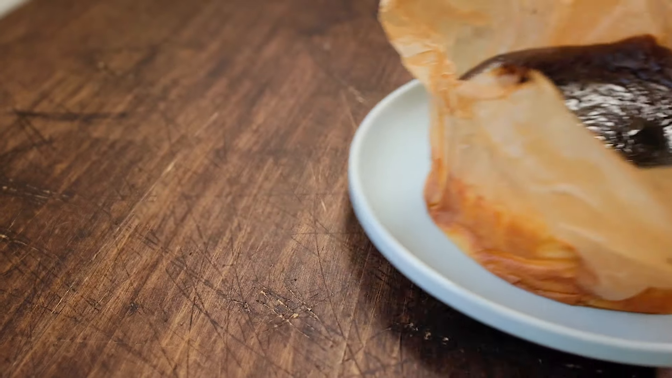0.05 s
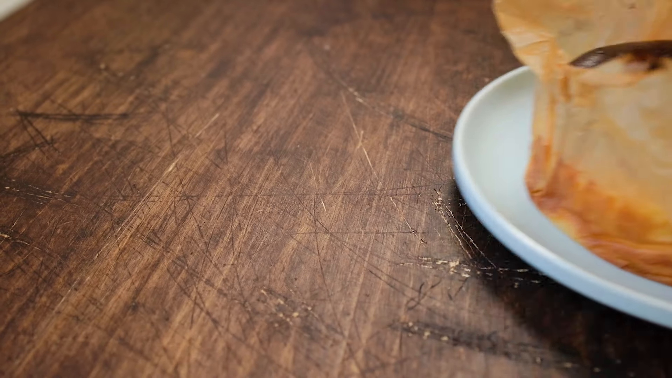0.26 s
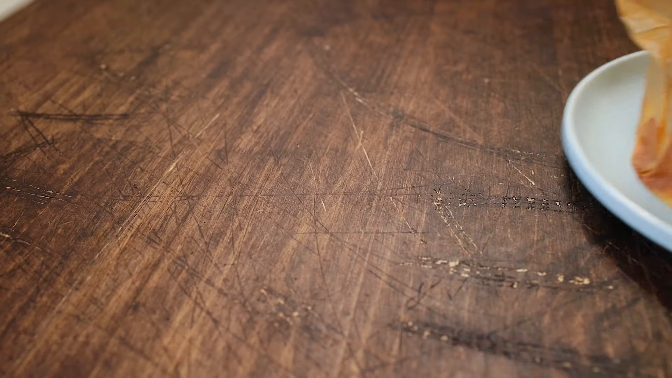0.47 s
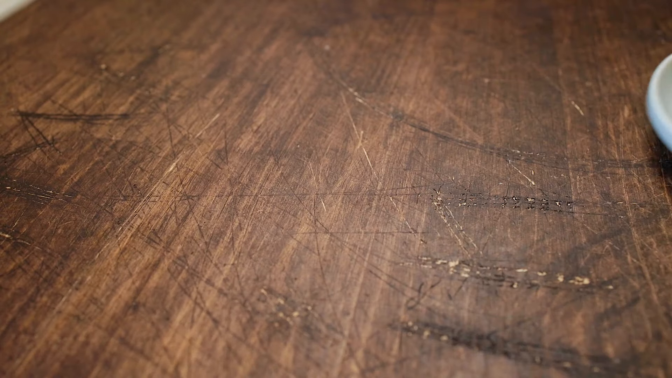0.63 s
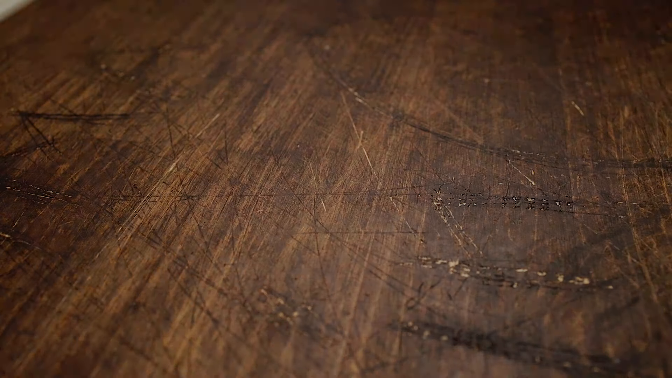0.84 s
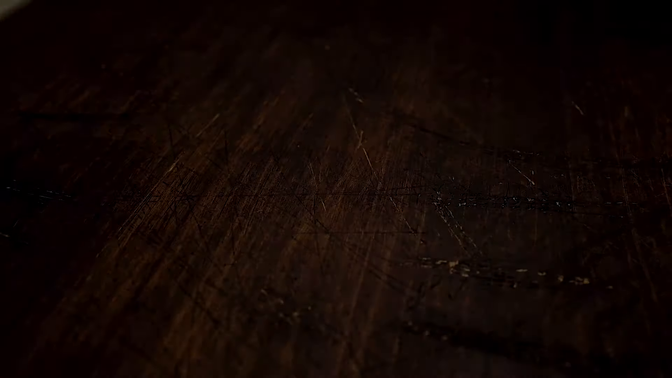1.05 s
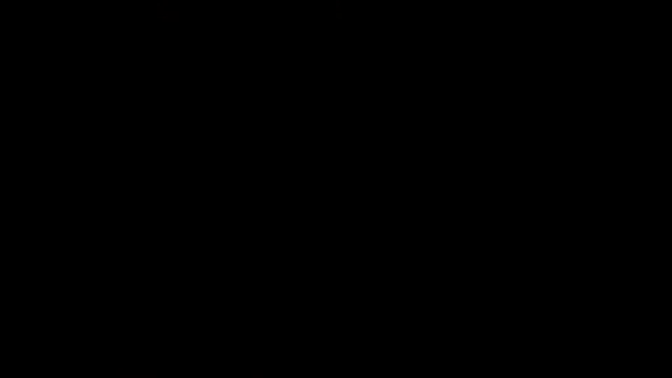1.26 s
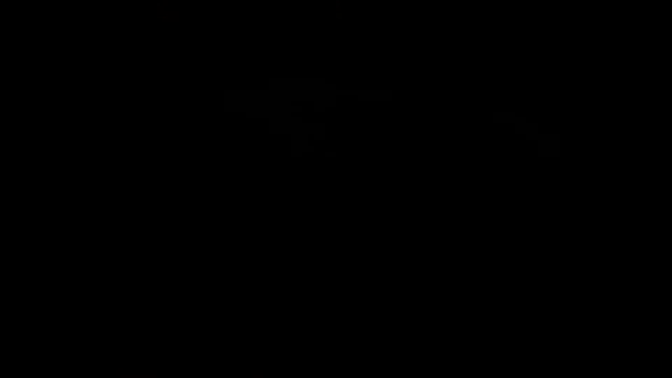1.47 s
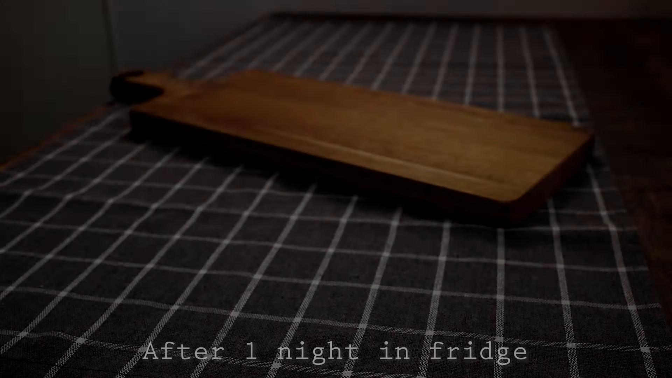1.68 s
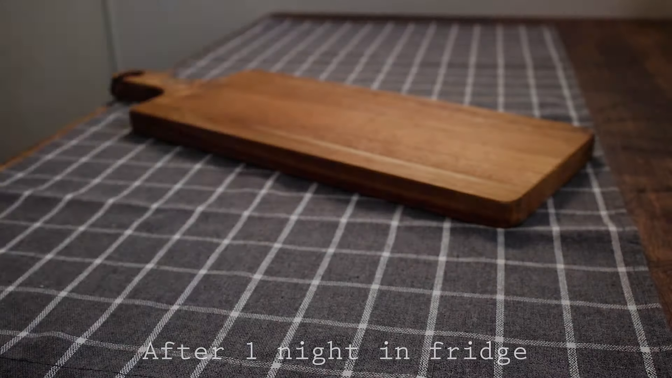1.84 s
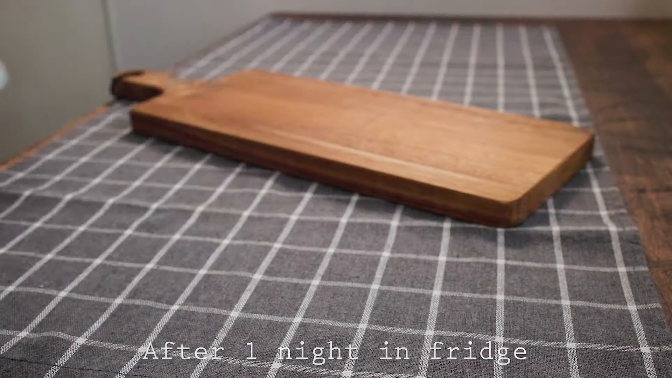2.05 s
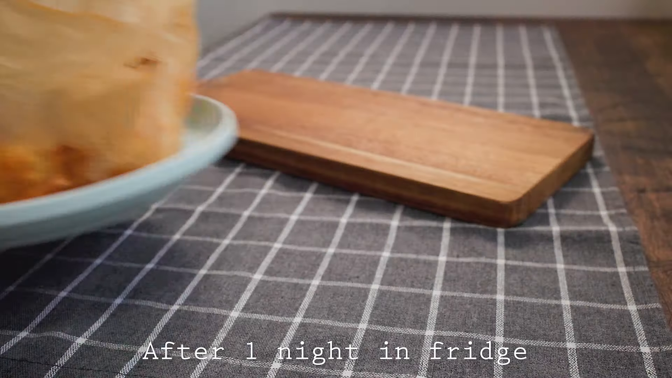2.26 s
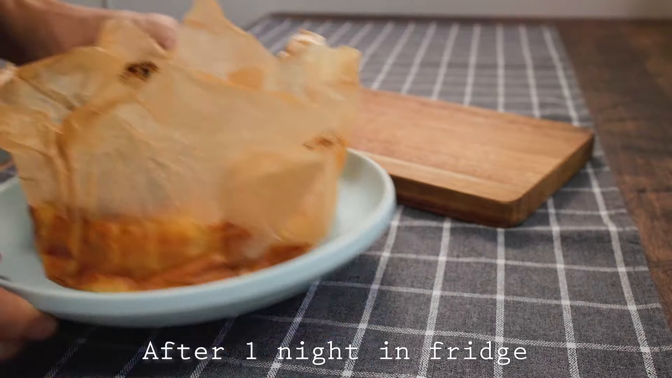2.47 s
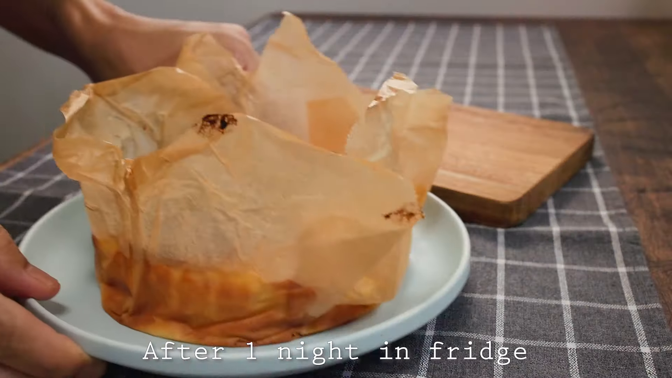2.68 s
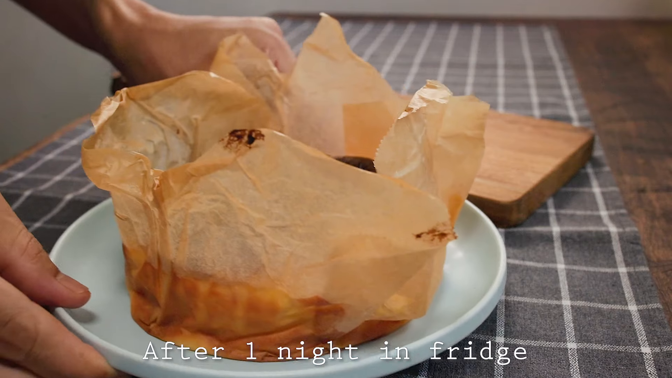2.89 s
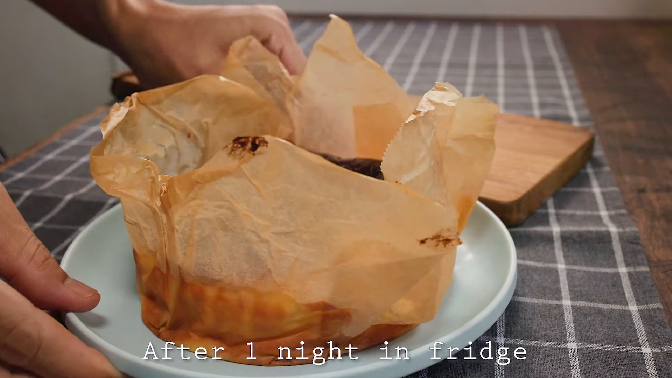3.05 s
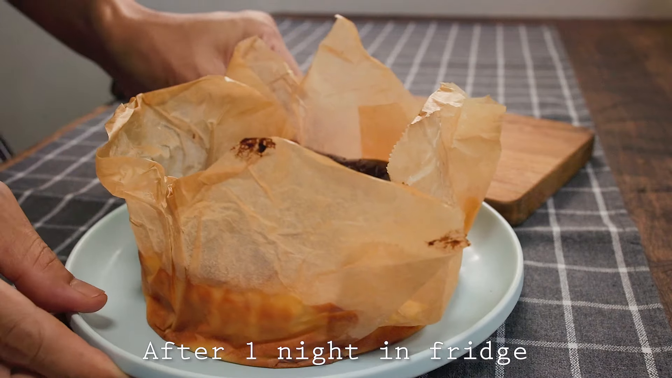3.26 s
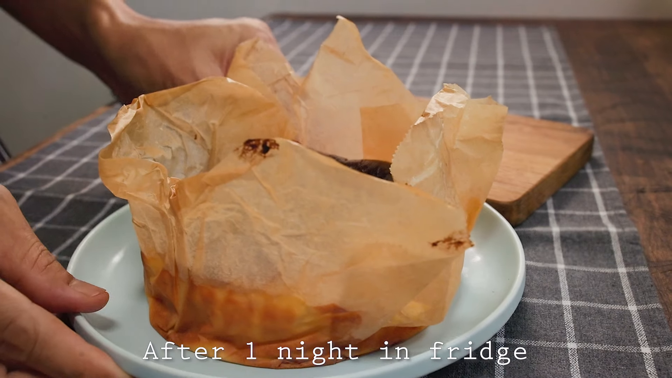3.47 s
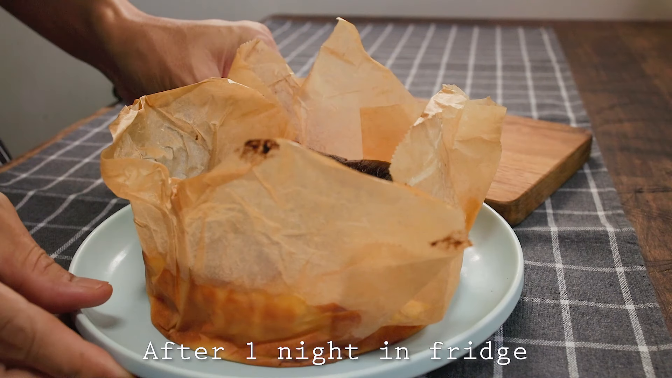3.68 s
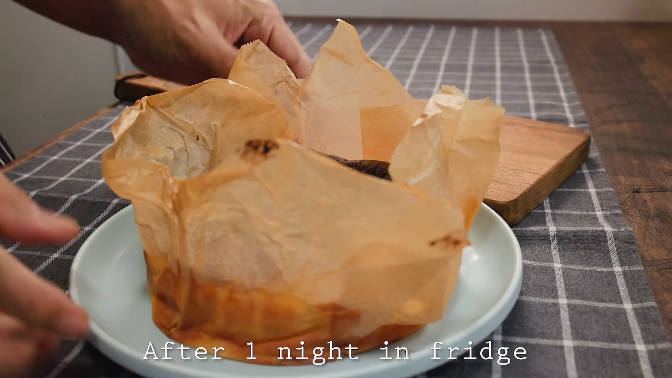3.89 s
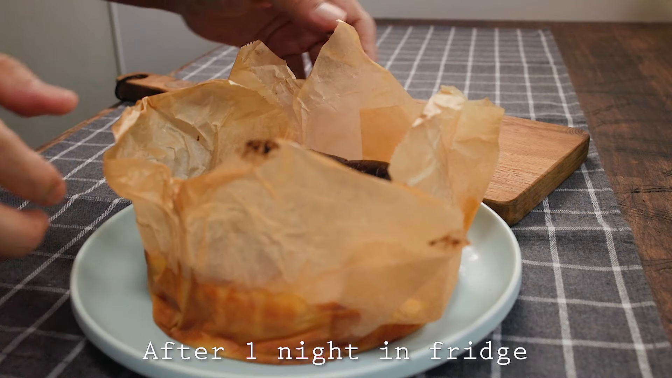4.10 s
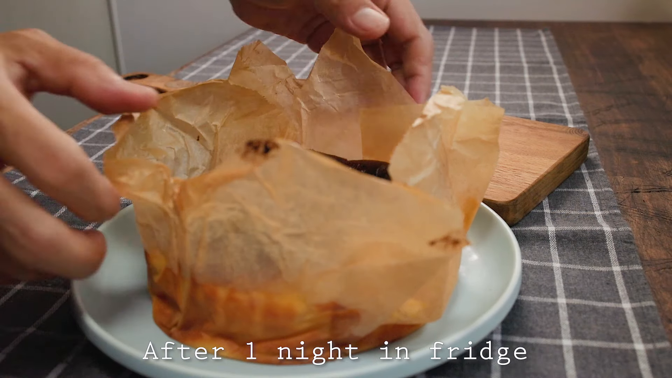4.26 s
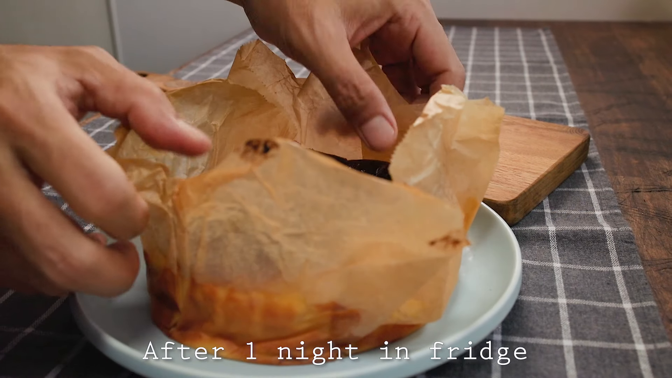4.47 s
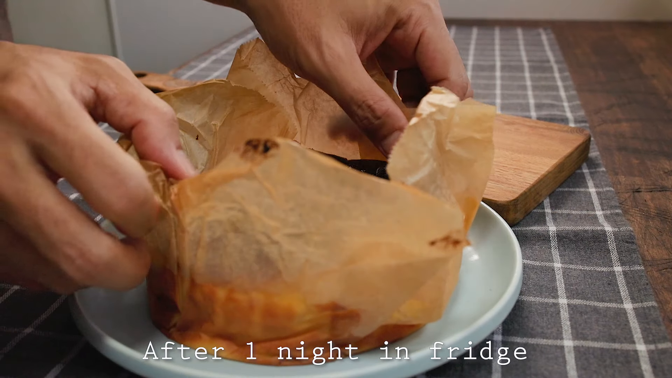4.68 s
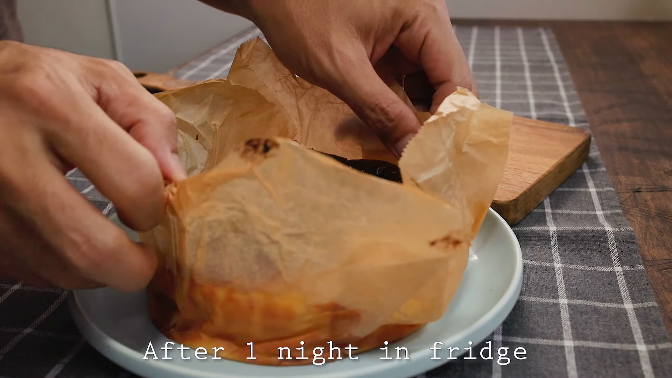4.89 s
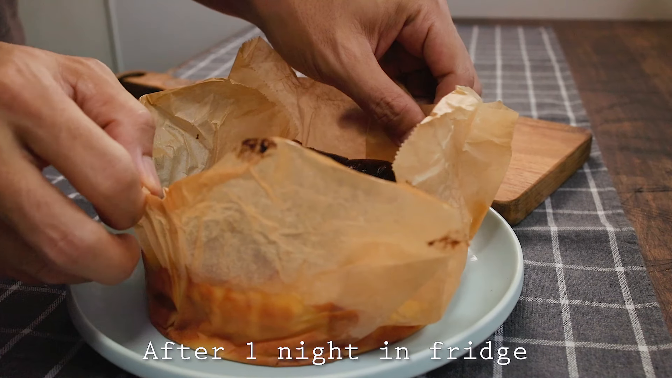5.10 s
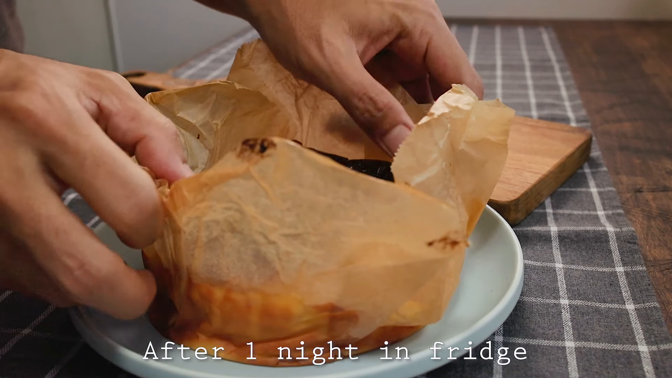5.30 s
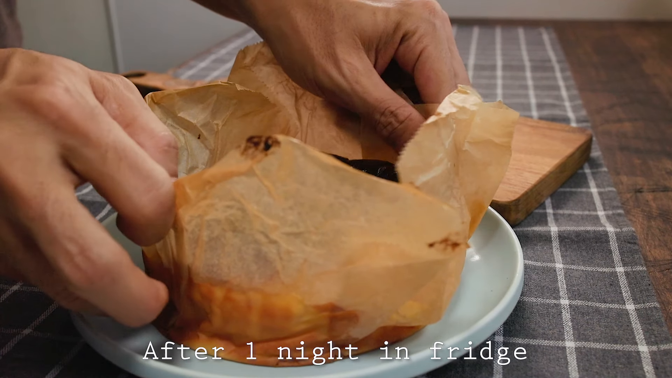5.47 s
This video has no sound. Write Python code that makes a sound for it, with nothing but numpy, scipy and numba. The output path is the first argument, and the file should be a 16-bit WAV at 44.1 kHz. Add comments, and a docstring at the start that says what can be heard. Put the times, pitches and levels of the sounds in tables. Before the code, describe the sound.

Gritty ceramic scraping with bumps on wood, faint brushing and a plate set down on cloth, then crisp parchment crinkling in sharp bursts.

```python
"""First, close by, a plate with a chilled cake is dragged off a wooden table: rumble, scratching grit, ringing rim.
An appliance hums at first; a door shuts further off in the kitchen, its knocks dense washes of reflections.
The plate returns with brushes, taps, bumps and a faint paper tick and is set down on a cloth. Then fingers tug
stiff baking paper from the cake: creases snap as damped modes, small ones at random, over a crackle of tiny clicks.
One close microphone, the same in both ears."""
import sys
import numpy as np
from scipy import signal
from scipy.fft import rfft, irfft, next_fast_len
from scipy.io import wavfile
from numba import njit

SR = 44100
rng = np.random.default_rng(int(sys.argv[2]) if len(sys.argv) > 2 else 0)


def log_audio(samples):
    """Write samples as a 16-bit WAV file to the path given in sys.argv[1]."""
    # one column per channel
    frames = np.atleast_2d(samples).T
    # limit to full scale, then quantise
    limited = np.clip(frames, -1, 1)
    pcm = np.round(limited * 32767).astype(np.int16)
    wavfile.write(sys.argv[1], SR, pcm)


N = 244314
TIME = np.arange(N) / SR

# Colour tables give a spectral shape: (f/Hz, relative level/dB).
# Resonance tables: (f/Hz, width/Hz, relative level/dB).

# paper snapping: first a faint tick as the plate lands, then creases flipping through:
# (t/s, level/dB, brightness/dB: top band up and low band down, facet f/Hz)
PAPER_SNAPS = [(2.7685, -48, 3.5, 1200), (4.489, -37, 9, 2610), (4.5007, -30, 8.5, 13500),
               (4.5056, -34.5, -7.5, 1270), (4.6318, -16, -3, 3020), (4.674, -47, -14, 900),
               (4.7227, -31.5, -7.5, 1150), (4.7699, -33.5, -4.5, 3550), (4.7787, -23.5, -1, 14500),
               (4.81, -37, 6, 990), (4.8143, -24, 0.5, 3310), (4.8382, -26.5, -6, 2640),
               (4.8448, -23.5, -2, 3880), (4.8493, -41, -13, 4300), (4.8745, -32.5, 6, 1010),
               (4.8939, -28, 5.5, 4100), (4.959, -25.5, 8.5, 10900), (4.9626, -21, -9.5, 2680),
               (4.975, -30, -3, 3740), (4.9829, -31.5, -10, 2900), (4.995, -37, -12, 2600),
               (4.9997, -27, 4, 3300), (5.0106, -27.5, 5.5, 2410), (5.0178, -22.5, -9, 1315),
               (5.0312, -27.5, -6, 5240), (5.0402, -40, 18, 14100), (5.0485, -29.5, 4, 12400),
               (5.0672, -35.5, 13.5, 6700), (5.0738, -31.5, 5, 4660), (5.0881, -26.5, 0, 2480),
               (5.1074, -33, 3, 4100), (5.1176, -32.5, -11, 4840), (5.1424, -22, 3, 2340),
               (5.1447, -19, -8.5, 7700), (5.1683, -35, -13, 3120), (5.1766, -32.5, -3, 3260),
               (5.205, -33, -8, 1110), (5.2207, -38, 4, 2570), (5.2306, -37.5, 3, 3970),
               (5.2928, -32.5, 1, 895), (5.296, -32, -4, 11000), (5.2995, -34, 5, 3330),
               (5.309, -26.5, -4, 1290), (5.3127, -25.5, 1, 4026), (5.3253, -37.5, -9, 2310),
               (5.356, -32, -5, 2740), (5.3615, -33, 9, 7300), (5.4118, -24, 0.5, 4730),
               (5.4338, -36.5, 12, 14000), (5.4453, -37, 9, 1600), (5.457, -34, -4, 2622),
               (5.4775, -24.5, 1.5, 3760), (5.5043, -28, -3, 6300), (5.5151, -30.5, -5, 6700),
               (5.5191, -24, 6.5, 8100), (5.5255, -38, 15, 9300)]
# bands in which the paper rings: (low f/Hz, high f/Hz, middle t60/s, level/dB)
PAPER_BANDS = [(760, 1830, 0.0063, -10.5), (2140, 6450, 0.0029, -2.5), (6260, 15400, 0.0042, -7.5)]
# tugs at the paper: (t of the peak/s, crackle drive/dB, dull handling drive/dB)
TUGS = [(4.667, -46, -37.5), (4.852, -43.5, -46), (5.002, -38.5, -65), (5.197, -41, -35.5),
        (5.307, -43.5, -73), (5.36, -53.5, -40.5), (5.53, -39.5, -40.5)]
# colour of the fibres letting go: (f/Hz, level/dB)
CRACKLE_COLOUR = [(150, -13), (400, 1), (1300, 10.5), (2100, -4), (3200, -2), (5500, -9), (12500, -5),
                  (16000, -14)]
# colour of fingers jostling the cake: (f/Hz, level/dB)
HANDLING_COLOUR = [(25, -20), (60, -2.5), (140, 0), (330, -3), (700, -7.5), (1600, -61)]
# fingers rubbing the paper: (from t/s, to t/s, rub drive/dB, rustle level/dB)
RUBS = [(4.257, 4.316, -55, -72), (4.368, 4.621, -60, -54)]
# colour of skin hissing on paper: (f/Hz, level/dB)
RUB_COLOUR = [(100, 0), (300, -14), (900, -11.5), (2000, -26), (2800, -30), (5200, -17), (8000, -21.5),
              (16000, -23)]
# colour of the grainy rustle: (f/Hz, level/dB)
RUSTLE_COLOUR = [(500, 1), (1400, -10), (2100, -6), (2700, 3), (4100, -1), (5200, -13), (9000, -38)]
# resonances of the rubbed sheet: (f/Hz, width/Hz, level/dB)
SHEET_MODES = [(785, 190, 3), (1180, 240, -1)]
# higher resonances of the first touch: (f/Hz, width/Hz, level/dB)
TOUCH_MODES = [(2840, 200, -0.5), (6820, 220, -0.5)]
# resonances of the creak: (f/Hz, width/Hz, level/dB)
CREAK_MODES = [(1420, 230, 4), (3040, 560, -2.5)]
# plate resonances: (f/Hz, width/Hz, level/dB)
PLATE_MODES = [(877, 19, 2.5), (1313, 8, 4), (2160, 22, -2), (2607, 37, -3), (3126, 17, -2), (4340, 32, -5)]
# resonances of the juddering plate: (f/Hz, width/Hz, level/dB)
JUDDER_MODES = [(870, 150, -1.5), (1430, 190, 0.24), (2120, 150, -0.25)]
# the rim scuffing over the grain: (t/s, drive/dB)
RIM_SCUFFS = [(.241, -43.5), (.276, -44), (.34, -40.5), (.386, -42.5), (.458, -44), (.487, -44),
              (.517, -41.5), (.548, -46), (.564, -41.5), (.5865, -35.5)]
# colour of the plate's rumble: (f/Hz, level/dB)
RUMBLE_COLOUR = [(25, -26), (48, -31.5), (67, 12), (92, -13), (118, -1), (160, -6.5), (260, -4.5),
                 (380, -14.5), (520, -22.5), (1200, -54.5)]
# colour of the scrape on wood: (f/Hz, level/dB)
SCRAPE_COLOUR = [(250, -9), (500, -1.5), (1100, -1), (1700, -5.5), (2700, -10), (4400, -12.5), (5500, -27),
                 (16000, -34)]
# colour of sliding hiss and fine fizz: (f/Hz, level/dB)
FIZZ_COLOUR = [(1500, -4.5), (6000, -4), (16000, -22)]
# plate and cake bumping the table: (t/s, peak level/dB, contact time/s)
BUMPS = [(.066, -24.5, 0.0025), (0.275, -25, 0.0027), (0.338, -16.5, 0.0044), (0.4287, -17.5, 0.0044),
         (0.457, -20.5, 0.0028), (2.548, -45, 0.012), (2.766, -17, 0.0064), (2.7715, -23.5, 0.0017),
         (3.087, -41.5, 0.0174), (4.426, -35, 0.0053), (5.201, -26.5, 0.0053), (5.328, -28, 0.0012)]
# modes of the table with the plate on it: (f/Hz, level/dB, t60/s)
TABLE_MODES = [(51.4, -24.5, 1), (113, -6.5, 0.16), (126, -3, 0.035), (188, 4.5, 0.038),
               (268.7, 7.5, 0.071), (337, 1, 0.015), (508, -8.5, 0.22), (640, -1, 0.1)]
# hands and plate brushing cloth and paper:
# (t of the peak/s, level/dB, length/s: rise plus fall width, fizz re level/dB, rumble level/dB)
STROKES = [(1.504, -61, 0.087, -0.5, -87), (2.17, -58.5, 0.17, -23, -51.5), (2.491, -55.5, 0.1, 6.5, -53),
           (2.824, -62, 0.19, 2, -53), (3.005, -60, 0.25, -11, -72), (3.13, -61, 0.067, -19, -62),
           (3.273, -62.5, 0.071, -26, -56), (3.474, -61.5, 0.05, -25, -62), (3.897, -70, 0.06, 9, -74)]
# colour of the brushed weave: (f/Hz, level/dB)
BRUSH_COLOUR = [(200, -4), (500, 6.5), (2600, 0.5), (7500, -11.5), (16000, -25)]
# light taps of fingers and plate, and at 1.843 s a softer door knock with a long wash: (t/s, level/dB, t60/s)
TAPS_AND_SOFT_KNOCK = [(1.843, -50.5, 0.4), (2.7675, -46.5, 0.057), (3.2845, -43, 0.049),
                       (4.0185, -40.5, 0.039)]
# colour of the taps and the softer knock: (f/Hz, level/dB)
TAP_COLOUR = [(150, 11), (950, 7.5), (1360, 11), (1900, -1.5), (3200, -2.5), (6000, -27)]
# door knocks across the kitchen: (t/s, level/dB, t60/s)
DOOR_KNOCKS = [(1.4105, -44, 0.31), (1.995, -33.5, 0.34)]
# colour of the door: (f/Hz, level/dB)
DOOR_COLOUR = [(40, -36), (90, 4), (540, 2.5), (700, -7.5), (1400, -2), (2400, -8), (3100, -3),
               (4100, -5.5), (5000, -20.5), (16000, -36)]
# colour of the quiet kitchen: (f/Hz, level/dB)
AIR_COLOUR = [(20, -4.5), (70, -8), (112, 6.5), (150, -12.5), (230, -1.5), (420, -10), (1000, -16.5),
              (4000, -27.5), (16000, -34)]
# colour of the appliance's hum: (f/Hz, level/dB)
HUM_COLOUR = [(30, -20), (65, 7), (105, -26), (180, 5), (360, -6.5), (700, -19), (1800, -40), (3800, -32),
              (16000, -44.5)]
# resonances of the appliance: (f/Hz, width/Hz, level/dB)
HUM_MODES = [(69.8, 2.2, 7), (1371, 25, -4.5), (4100, 80, -15), (6740, 220, -14.5)]

# the facet that flips: its pitch falls by a share; a life is its time scale at 1 kHz
FACET_DB, FACET_LIFE_S, FACET_SAG = -3.5, 0.017, 0.21
BRIGHTER_DB_PER_DB, USUAL_SNAP_DB = 0.39, -29.5  # a harder snap is brighter
SNAP_LOW_CUT_HZ = 354  # below this the snaps carry little
# small creases: mean rate, level over the crackle drive, random range (+-) of level and brightness, middle pitch
SMALL_PER_S, SMALL_OVER_CRACKLE_DB, SMALL_SPREAD_DB, SMALL_COLOUR_DB, SMALL_FACET_HZ = 85, -3.5, 9.5, 8, 2840
# the fingers take hold and tighten their grip: drives of crackle (at first) and of handling
GRIP_S, GRIP_CRACKLE_DB, GRIP_DB_PER_S, GRIP_HANDLING_DB = 4.37, -51.5, 4, -50
TUG_RISE_S, TUG_FALL_S = 0.016, 0.024
# a fingertip sticks and slips, weaker at each slip
CREAK_S, CREAK_DB, CREAK_SLIPS_PER_S, CREAK_FADE_DB_PER_S = 4.507, -38, 57, 53
TOUCH_HZ, TOUCH_FALL_OCT_PER_S, TOUCH_DB = 980, 12, -57  # start of the sliding ring
HISS_T60_S = 0.032  # the rubbing dies away when a finger stops
SHEET_BEND_PER_S, SHEET_BEND_SHARE = 28, 0.028
# drives of the even slide, and what the starting jerk adds with its time constant
DRAG_RUMBLE_DB, DRAG_SCRAPE_DB = -36, -50.5
JERK_RUMBLE_DB, JERK_SCRAPE_DB, JERK_S = 5.5, 9.5, 0.16
LIFT_S, LIFT_T60_S = 0.55, 0.47  # the plate leaves the table
RIM_OFF_S, RIM_T60_S = 0.664, 0.23  # the rim scrapes on a little longer
RIM_FADE_S, RIM_FADE_DB_PER_S = 0.53, 59  # it lightens as the plate tips off
PLATE_WANDER_PER_S, PLATE_WANDER_DB, PLATE_BEND_SHARE = 32, 4, 0.024
CATCHES_PER_S, CATCH_T60_S, CATCH_DB = 180, 0.024, -8  # grit catching under the rim
SLIDE_HISS_DB, JUDDER_DB = -58.5, -43.5
STROKE_RISE_SHARE = 0.33
TAP_RISE_S, DOOR_RISE_S = 0.0003, 0.004
AIR_DB, HUM_NOISE_DB, HUM_RING_DB = -61, -55.5, -61
TOP_HZ = 15900


def pull():
    """Drives of crackle and handling noise: a tightening grip with tugs on top."""
    grip = np.clip((TIME - GRIP_S) / TUG_RISE_S, 0, 1)
    crackle = grip * undb(GRIP_CRACKLE_DB + GRIP_DB_PER_S * (TIME - GRIP_S))
    handling = grip * undb(GRIP_HANDLING_DB)
    for s, crackle_db, handling_db in TUGS:
        tug = swell(s, TUG_RISE_S, TUG_FALL_S)
        crackle = np.hypot(crackle, undb(crackle_db) * tug)
        handling = np.hypot(handling, undb(handling_db) * tug)
    return crackle, handling


def small_creases(effort, count=160):
    """Random rows like PAPER_SNAPS: small creases give way more often and louder where the pull is hard."""
    place, loud, bright = rng.uniform(-1, 1, (count, 3)).T
    due = np.cumsum(effort) / effort.sum() * SMALL_PER_S * (TIME[-1] - GRIP_S)
    turn = np.arange(count) + 1 + place
    s = np.interp(turn, due, TIME)
    effort_db = 20 * np.log10(np.interp(s, TIME, effort) + 1e-9)
    db = effort_db + SMALL_OVER_CRACKLE_DB + SMALL_SPREAD_DB * loud
    facet_hz = SMALL_FACET_HZ * 2 ** (2 * bright)
    return np.transpose([s, db, SMALL_COLOUR_DB * bright, facet_hz])[turn < due[-1]]


def facet_ring(t, hz):
    """A flipping facet sags in pitch as it relaxes; big, low facets ring longer."""
    life = t / (FACET_LIFE_S * np.sqrt(1000 / hz))
    sagging_hz = hz * (1 + FACET_SAG * (np.exp(-10 * life) - 0.5))
    return np.sin(2 * np.pi * np.cumsum(sagging_hz) / SR) * fade(life, 0.92)


def snaps(rows, count=4, spread=0.000486):
    """Paper flips in a quick run of jerks that ring sheet modes and a facet; plate and table echo it."""
    out, t = np.zeros(N), np.arange(SR // 32) / SR
    head = SR // 360  # levels are set over the first 3 ms
    chance = rng.random((256, len(PAPER_BANDS), 5, count))
    echoes = rng.standard_normal((256, len(t)))
    for (s, db, bright_db, facet_hz), draws, echo in zip(rows, chance, echoes):
        tilt_db = bright_db + BRIGHTER_DB_PER_DB * (db - USUAL_SNAP_DB)
        facet = facet_ring(t, facet_hz)
        snap = undb(FACET_DB) * facet / np.std(facet[:head])
        for band, band_db, draw in zip(PAPER_BANDS, (-tilt_db, 0, tilt_db), draws):
            lo, hi, t60, gain_db = band
            place, sign, size, damping, lag = draw
            hz = lo * (hi / lo) ** ((np.arange(count) + place) / count)
            age = np.maximum(t - spread * lag[:, None], 0)
            modes = np.sin(2 * np.pi * hz[:, None] * age) * fade(age, t60 * (0.5 + damping[:, None]))
            ring = (np.sign(sign - 0.5) * undb(10 * size)) @ modes
            snap = snap + undb(band_db + gain_db) * ring / np.std(ring[:head])
        # every snap lies elsewhere, so its first echoes are its own
        echoed = reflections(snap, echo, t60=0.016, damp_hz=6860)
        add(out, s, undb(db) * (snap + undb(-11.0) * echoed))
    # the snaps carry little bass
    return highpass(out, SNAP_LOW_CUT_HZ)


def peeling(crackle, handling, count=14):
    """Fibres let go in a fine crackle, the paper unsticks in duller pops, and the fingers jostle the cake."""
    fibres = colour(ticks(rate=1200, spread_db=7.0), CRACKLE_COLOUR)
    # every patch of the sheet pops at its own pitch
    patches = np.geomspace(650, 4500, count)
    pops = unit(sum(resonate(ticks(rate=39, spread_db=4.0), [(hz, hz / 4, 0)]) for hz in patches))
    jostle = colour(ticks(rate=940, spread_db=6.0), HANDLING_COLOUR)
    return crackle * (undb(-7.0) * fibres + undb(-3.5) * pops) + handling * undb(-1.0) * jostle


def first_touch():
    """The first touch bends the sheet: a hollow ring slides down under steady higher resonances."""
    start, stop = RUBS[0][:2]
    sliding_hz = TOUCH_HZ * 2 ** (-TOUCH_FALL_OCT_PER_S * (np.clip(TIME, start, stop) - start))
    hollow = unit(bandpass(rng.standard_normal(N), sliding_hz, TOUCH_HZ / 10))
    hollow = hollow + resonate(rng.standard_normal(N), TOUCH_MODES)
    return undb(TOUCH_DB) * held(start, stop, HISS_T60_S) * hollow


def creaking(t60=0.045, count=7):
    """A fingertip sticks and slips: nearly regular bursts of noise through drifting resonances."""
    ages = (np.arange(count) + 0.065 * rng.standard_normal(count)) / CREAK_SLIPS_PER_S
    slips = [(CREAK_S + age, CREAK_DB - CREAK_FADE_DB_PER_S * age) for age in ages]
    ring = wander(rng.standard_normal(N), CREAK_MODES, SHEET_BEND_PER_S, SHEET_BEND_SHARE, depth_db=3.5)
    return blows(slips, t60) * ring


def rubbing(effort):
    """Skin on paper: a hollow touch, a grainy rustle, a short dull creak, then a hiss that follows the pull."""
    # as the sheet bends, its resonances slide
    ring = wander(rng.standard_normal(N), SHEET_MODES, SHEET_BEND_PER_S, SHEET_BEND_SHARE, depth_db=4.0)
    rub = undb(1.0) * noise(RUB_COLOUR) + ring
    rustle = colour(ticks(rate=1800, spread_db=0.0), RUSTLE_COLOUR) * flutter(rate=320, depth_db=1)
    contact = 0
    for start, stop, db, rustle_db in RUBS:
        grain = undb(db) * rub + undb(rustle_db) * rustle
        contact = contact + held(start, stop, HISS_T60_S) * grain
    return contact + first_touch() + creaking() + undb(-14.5) * effort * rub


def drag(clink_t60=0.047):
    """The plate's foot slips unevenly over the grain: the table rumbles, grit scratches and the plate rings."""
    jerk = np.exp(-TIME / JERK_S)
    slips = ticks(rate=2500, spread_db=1.0) * flutter(rate=67, depth_db=1.0)
    # the contact point wanders, so each resonance shifts, comes and goes
    ring = wander(slips, PLATE_MODES, PLATE_WANDER_PER_S, PLATE_BEND_SHARE, PLATE_WANDER_DB)
    grit = np.abs(ticks(CATCHES_PER_S, spread_db=-7.0))
    catches = unit(signal.fftconvolve(grit, fade(TIME[:SR // 8], CATCH_T60_S))[:N])
    scratch = noise(SCRAPE_COLOUR)
    # each scuff meets the rim at another place and rings its own mix of resonances
    rim_modes = PLATE_MODES[:1] + PLATE_MODES[2:]
    rim = wander(rng.standard_normal(N), rim_modes, PLATE_WANDER_PER_S, 2 * PLATE_BEND_SHARE, PLATE_WANDER_DB)
    clinks = blows(RIM_SCUFFS, clink_t60) * (undb(-5.5) * scratch + undb(-1) * rim)
    rumble = undb(DRAG_RUMBLE_DB + JERK_RUMBLE_DB * jerk) * held(0, LIFT_S, LIFT_T60_S) * noise(RUMBLE_COLOUR)
    tip_db = RIM_FADE_DB_PER_S * np.maximum(TIME - RIM_FADE_S, 0)
    weight = undb(DRAG_SCRAPE_DB + JERK_SCRAPE_DB * jerk - tip_db)
    grain = undb(-3.0) * colour(slips, SCRAPE_COLOUR)
    scrape = weight * (grain + undb(-8.0) * ring + undb(CATCH_DB) * catches * scratch)
    hiss = undb(SLIDE_HISS_DB) * noise(FIZZ_COLOUR)
    # in the first jerk the plate judders: a brief coarse growl
    judder = undb(JUDDER_DB) * jerk ** 2 * resonate(rng.standard_normal(N), JUDDER_MODES)
    return rumble + (scrape + hiss) * held(0, RIM_OFF_S, RIM_T60_S) + clinks + judder


def bumps():
    """A soft push into the table's modes; a longer contact is duller."""
    out, t = np.zeros(N), np.arange(SR // 3) / SR
    ring = sum(undb(db) * np.cos(2 * np.pi * hz * t) * fade(t, t60) for hz, db, t60 in TABLE_MODES)
    for s, db, contact in BUMPS:
        push = np.sin(np.pi * np.minimum(t / contact, 1)) ** 2
        thud = signal.fftconvolve(ring, push)[:len(t)]
        thud = highpass(thud, 40)  # the table hardly radiates the lowest bass
        add(out, s, undb(db) * thud / np.abs(thud).max())
    return out


def brushing():
    """Strokes over cloth and paper swell and fade, with a fine fizz; the moving plate rumbles softly."""
    weave = colour(ticks(rate=7000, spread_db=2), BRUSH_COLOUR)
    fizz, rumble, out = noise(FIZZ_COLOUR), noise(RUMBLE_COLOUR), 0
    for s, db, length, fizz_db, rumble_db in STROKES:
        stroke = swell(s, STROKE_RISE_SHARE * length, (1 - STROKE_RISE_SHARE) * length)
        brush = undb(db) * (weave + undb(fizz_db) * fizz)
        out = out + stroke * (brush + undb(rumble_db) * rumble)
    return out


def taps_and_soft_knock():
    """Light taps of fingers and plate, and a softer door knock with a long wash: noise with a very quick rise."""
    return knocks(TAPS_AND_SOFT_KNOCK, TAP_COLOUR, TAP_RISE_S)


def door():
    """The door across the kitchen: each knock rises more slowly and flutters as it rattles in its frame."""
    return knocks(DOOR_KNOCKS, DOOR_COLOUR, DOOR_RISE_S) * flutter(rate=190, depth_db=1.0)


def background():
    """Still air as coloured noise, and an appliance humming through its resonances at first."""
    running = np.interp(TIME, [1.38, 1.5], [1, 0])
    hum = undb(HUM_NOISE_DB) * noise(HUM_COLOUR)
    hum = hum + undb(HUM_RING_DB) * resonate(rng.standard_normal(N), HUM_MODES)
    return undb(AIR_DB) * noise(AIR_COLOUR) + running * hum


def knocks(table, points, rise):
    """Blows that arrive as a dense, dying wash of reflections."""
    envelope = 0
    for s, db, t60 in table:
        age = np.maximum(TIME - s, 0)
        envelope = envelope + undb(db) * np.minimum(age / rise, 1) * fade(age, t60)
    return envelope * noise(points)


def reflections(x, grain, t60, damp_hz):
    """A dying wash of echoes with a given random grain, duller than the direct sound."""
    t = np.arange(len(grain)) / SR
    echo = grain * fade(t, t60) * (t > 0.0008)
    echo = signal.lfilter(*signal.butter(1, damp_hz, fs=SR), echo)
    return signal.fftconvolve(x, echo / np.linalg.norm(echo))[:len(x)]


def blows(table, t60):
    """Envelope that jumps at each (t/s, level/dB) row and dies away."""
    out, tail = np.zeros(N), fade(TIME[:SR // 4], t60)
    for s, db in table:
        add(out, s, undb(db) * tail)
    return out


def swell(s, rise, fall):
    """A smooth rise to 1 at a time, and a smooth fall: a bell with two widths."""
    return np.exp(-0.5 * ((TIME - s) / np.where(TIME < s, rise, fall)) ** 2)


def held(start, stop, t60):
    """On from start to stop, then dying away."""
    return (TIME >= start) * fade(np.maximum(TIME - stop, 0), t60)


def fade(t, t60):
    """Exponential decay, 60 dB down at t60."""
    return undb(-60 * t / t60)


def ticks(rate, spread_db):
    """Random clicks of either sign whose levels spread exponentially; rms 1."""
    size = undb(spread_db * np.minimum(rng.exponential(size=N), 4))
    return unit((rng.random(N) < rate / SR) * size * rng.choice([-1, 1], N))


def flutter(rate, depth_db):
    """A gain that wanders at random."""
    knots = rng.standard_normal(4096)
    return undb(depth_db * np.interp(TIME * rate, np.arange(len(knots)), knots))


def noise(points):
    """Coloured noise of rms 1."""
    return colour(rng.standard_normal(N), points)


def colour(x, points):
    """Causal (minimum-phase) filter with a (f/Hz, level/dB) shape; rms 1."""
    size = next_fast_len(N + SR // 4)
    size += size % 2
    hz, db = np.transpose(points)
    f = np.maximum(np.arange(size // 2 + 1) * SR / size, 1)
    cepstrum = irfft(np.log(undb(np.interp(np.log(f), np.log(hz), db))))
    # folding the cepstrum forward in time makes the filter causal
    cepstrum[1:size // 2] *= 2
    cepstrum[size // 2 + 1:] = 0
    return unit(irfft(rfft(x, size) * np.exp(rfft(cepstrum)))[:N])


def resonate(x, peaks):
    """Parallel fixed resonances; rms 1."""
    out = 0
    for hz, width, db in peaks:
        ring = signal.lfilter(*signal.iirpeak(hz, hz / width, SR), x)
        out = out + undb(db) * unit(ring)
    return unit(out)


def wander(x, peaks, rate, share, depth_db):
    """Parallel resonances that drift in pitch by a share and come and go; rms 1."""
    out = 0
    for hz, width, db in peaks:
        drifting_hz = hz * flutter(rate, 20 * np.log10(1 + share))
        ring = unit(bandpass(x, drifting_hz, float(width)))
        out = out + undb(db) * ring * flutter(rate, depth_db)
    return unit(out)


@njit
def bandpass(x, hz, width):
    """State-variable band-pass whose centre moves."""
    y, band, low = np.empty(len(x)), 0., 0.
    for i in range(len(x)):
        g, k = np.tan(np.pi * hz[i] / SR), width / hz[i]
        v = (band + g * (x[i] + 1e-18 - low)) / (1 + g * (g + k))
        band, low, y[i] = 2 * v - band, low + 2 * g * v, k * v
    return y


def highpass(x, hz):
    """Second-order low cut."""
    return signal.sosfilt(signal.butter(2, hz, "high", fs=SR, output="sos"), x)


def undb(db):
    """Decibels to gain."""
    return 10 ** (np.asarray(db) / 20)


def unit(x):
    """Scale to rms 1."""
    return x / np.sqrt(np.mean(x ** 2) + 1e-20)


def add(track, s, sound):
    """Mix a sound in at a time."""
    i = int(s * SR)
    track[i:i + len(sound)] += sound[:N - i]


def scene():
    """Everything reaches one close microphone; the paper echoes round the kitchen."""
    crackle, handling = pull()
    rows = [*PAPER_SNAPS, *small_creases(crackle)]
    paper = snaps(rows) + peeling(crackle, handling) + rubbing(crackle)
    room = undb(-13.5) * reflections(paper, rng.standard_normal(SR // 2), t60=0.19, damp_hz=8600)
    mono = paper + room + drag() + bumps() + brushing() + taps_and_soft_knock() + door() + background()
    return np.array([mono, mono])


def record(dry):
    """The recorder cuts the top with a steep low-pass."""
    return signal.sosfilt(signal.ellip(8, 0.2, 70, TOP_HZ, fs=SR, output="sos"), dry)


dry = scene()
out = record(dry)
log_audio(out)
```